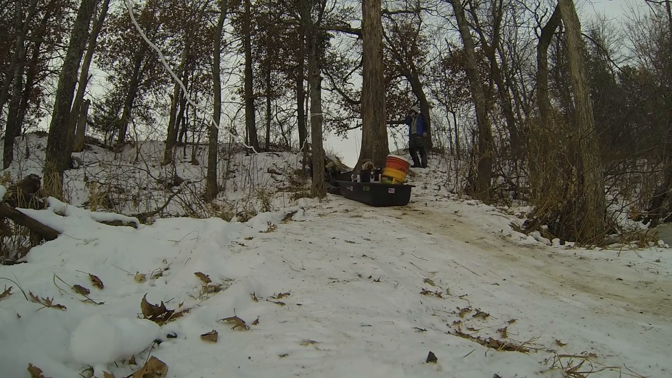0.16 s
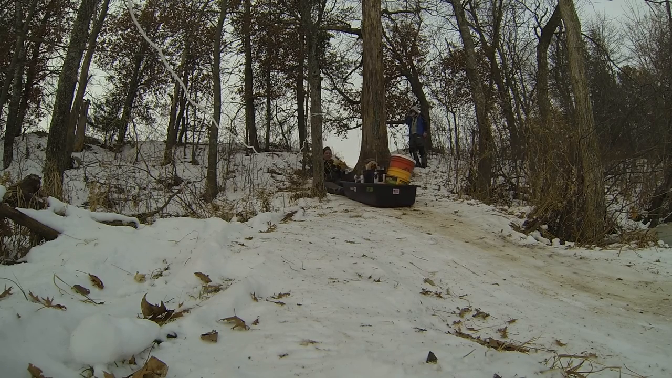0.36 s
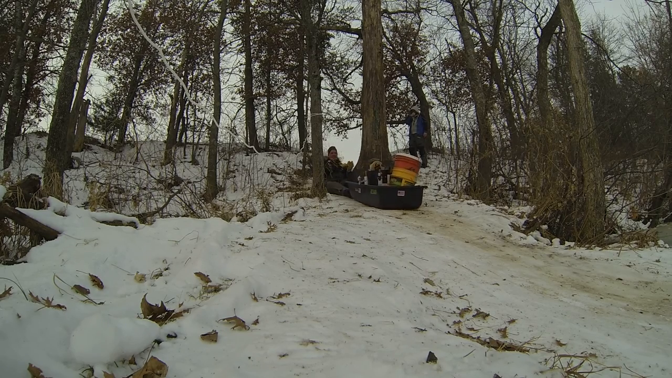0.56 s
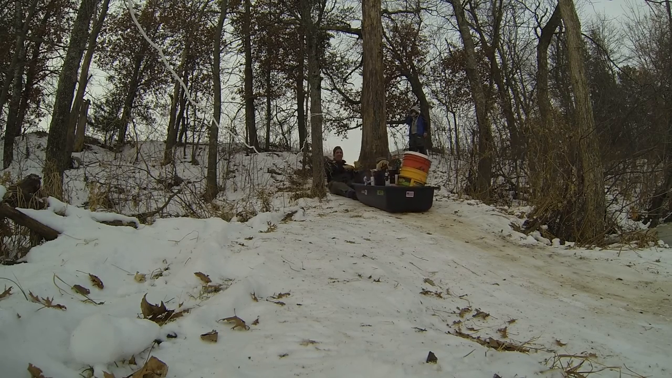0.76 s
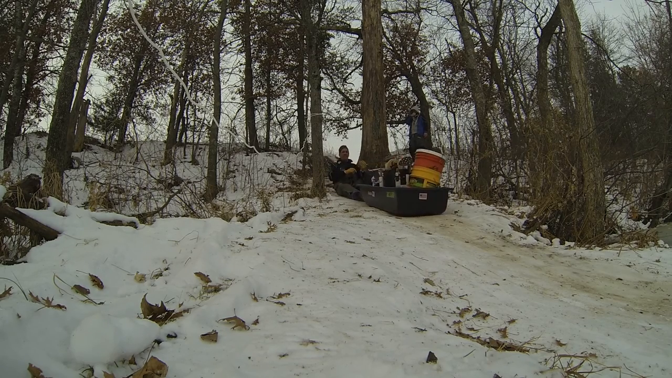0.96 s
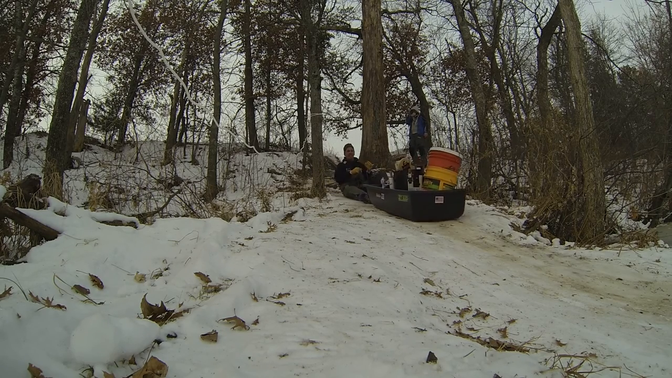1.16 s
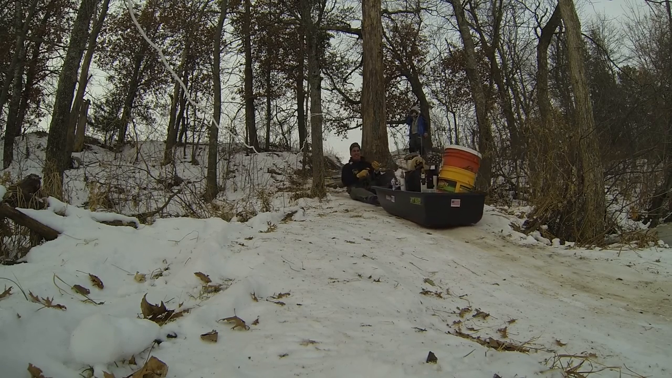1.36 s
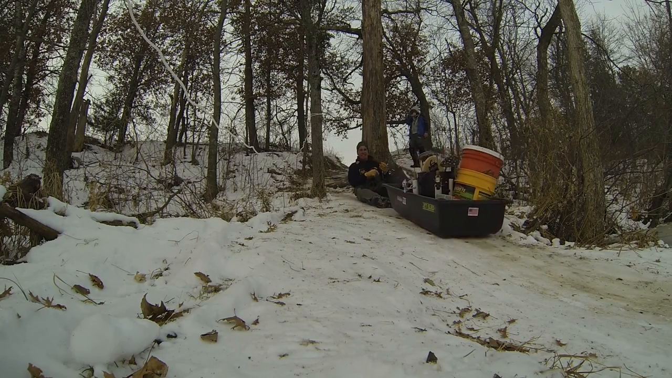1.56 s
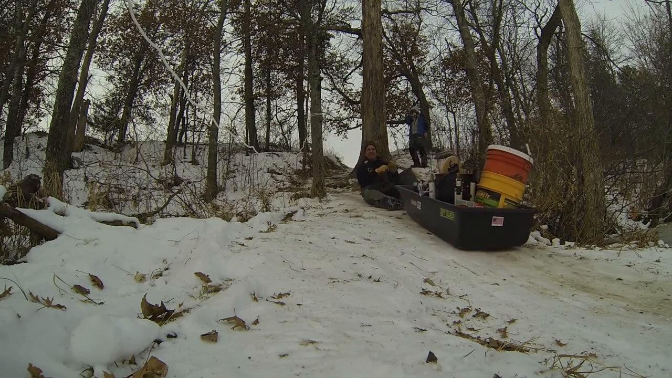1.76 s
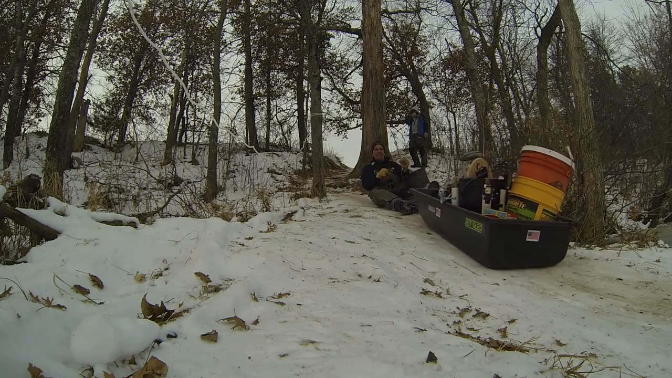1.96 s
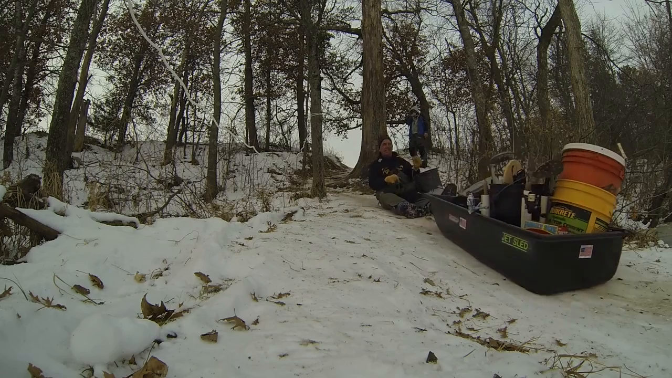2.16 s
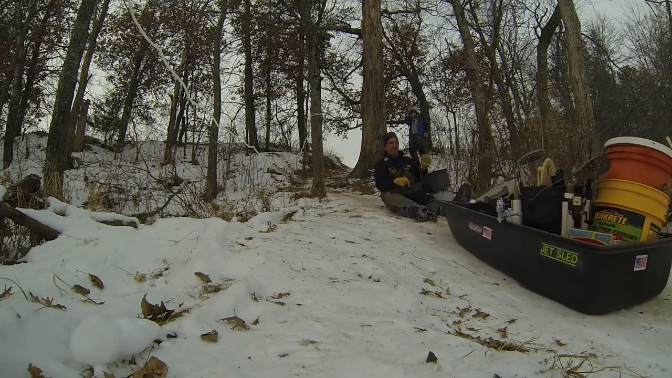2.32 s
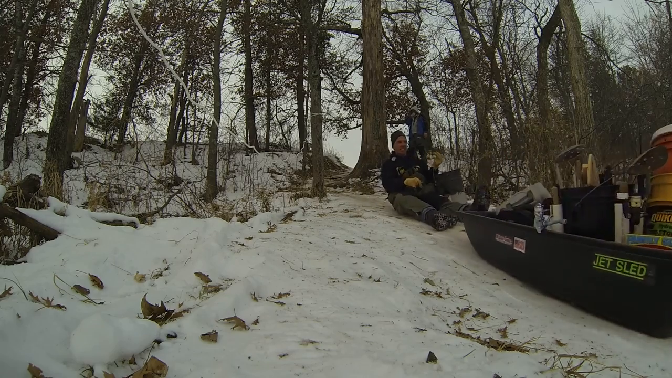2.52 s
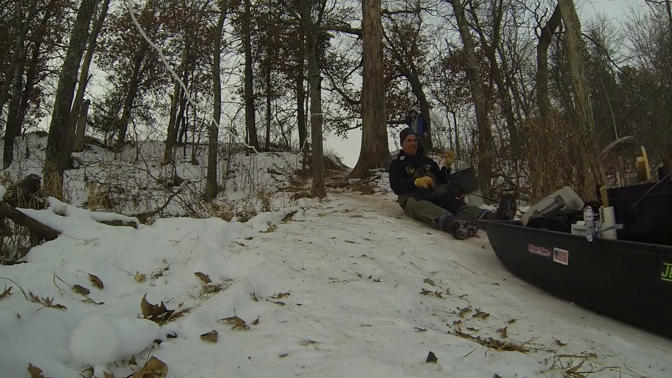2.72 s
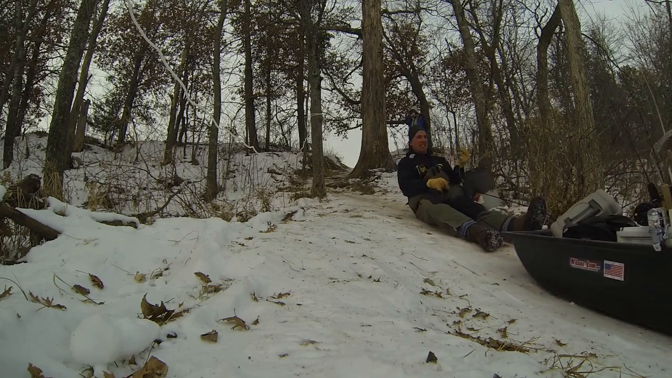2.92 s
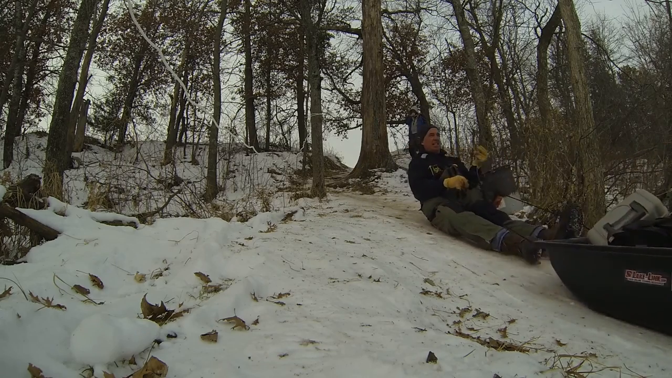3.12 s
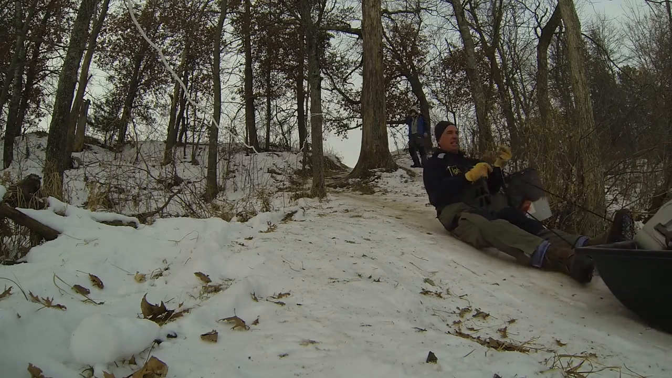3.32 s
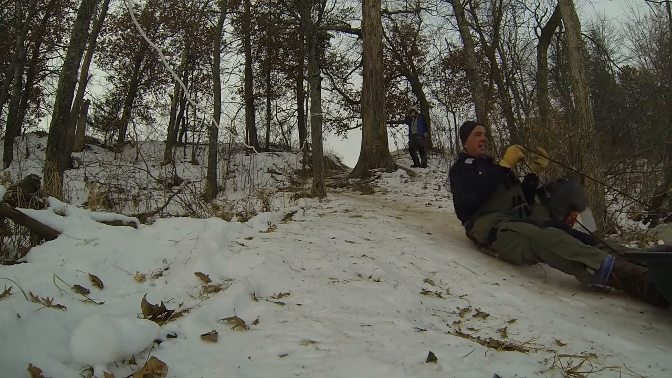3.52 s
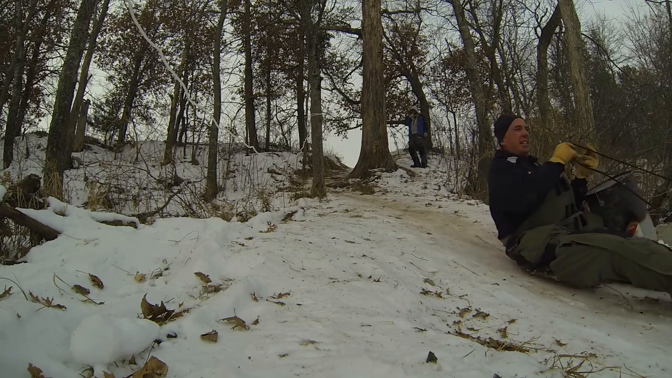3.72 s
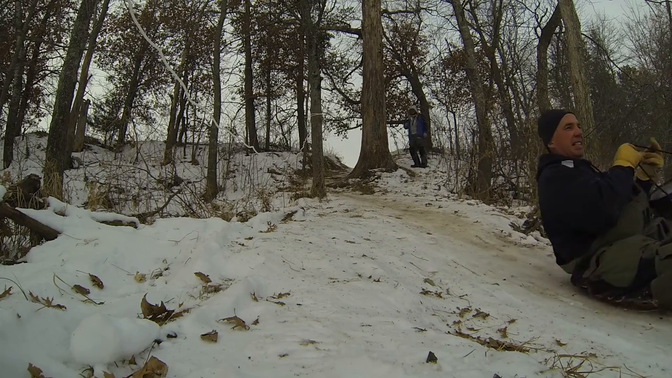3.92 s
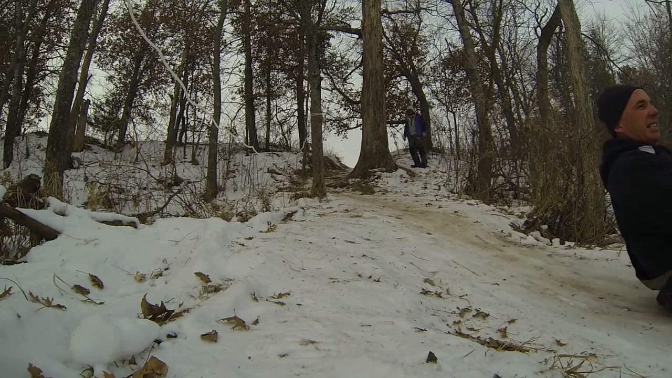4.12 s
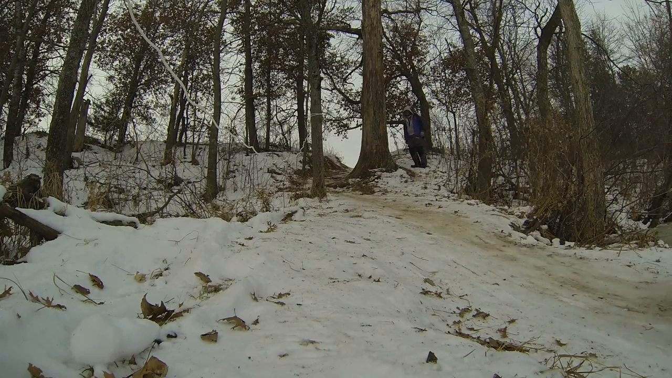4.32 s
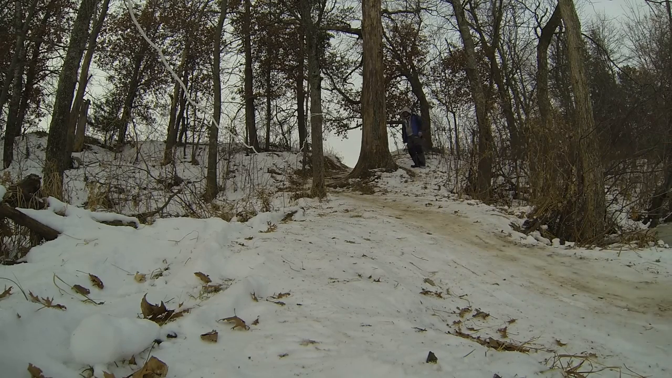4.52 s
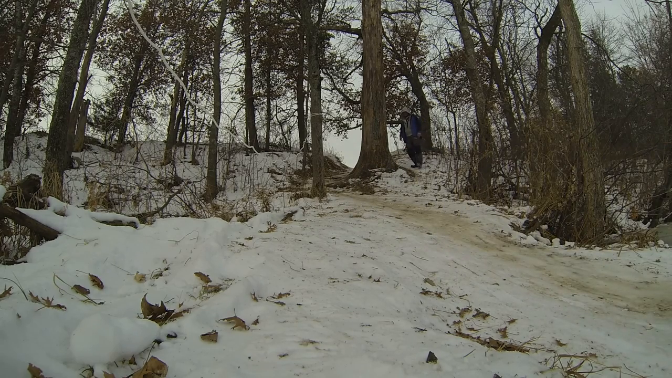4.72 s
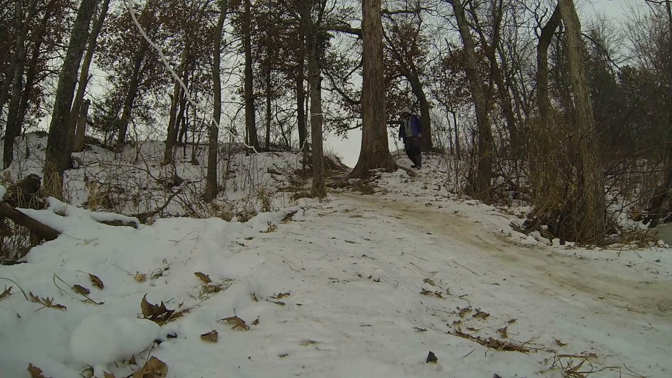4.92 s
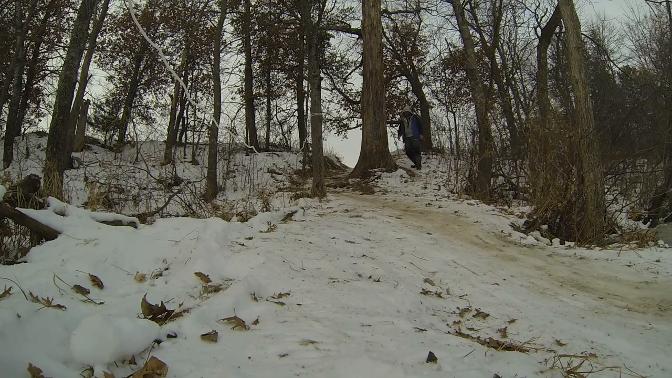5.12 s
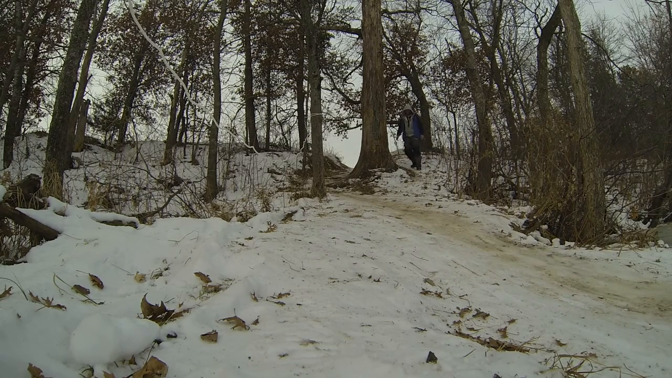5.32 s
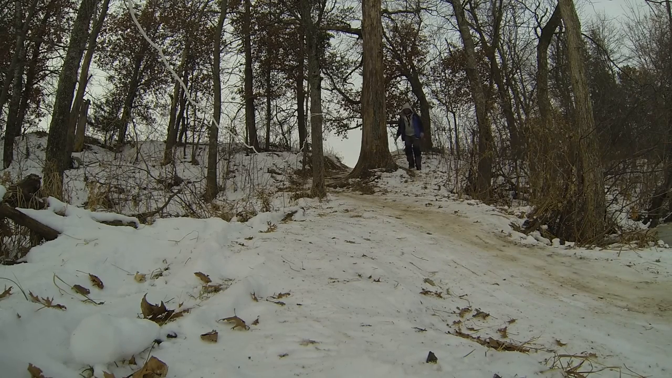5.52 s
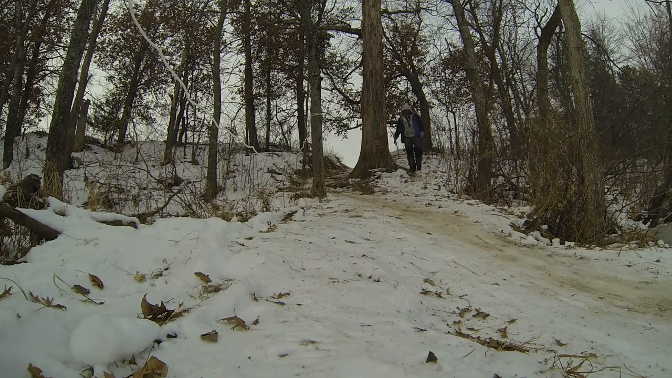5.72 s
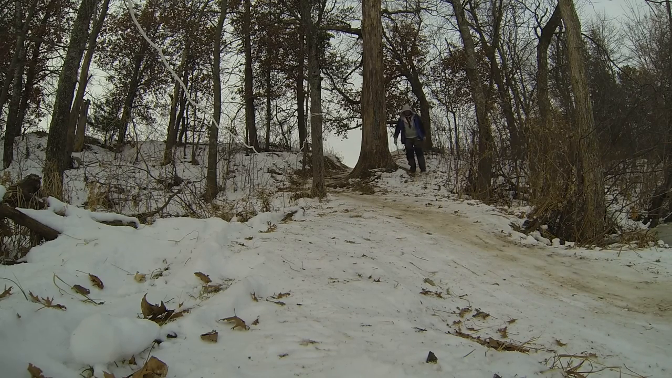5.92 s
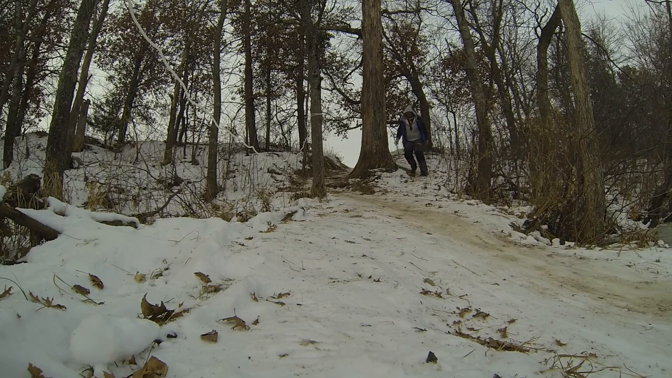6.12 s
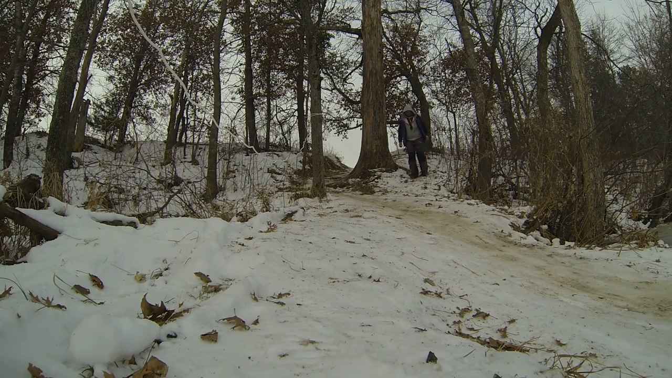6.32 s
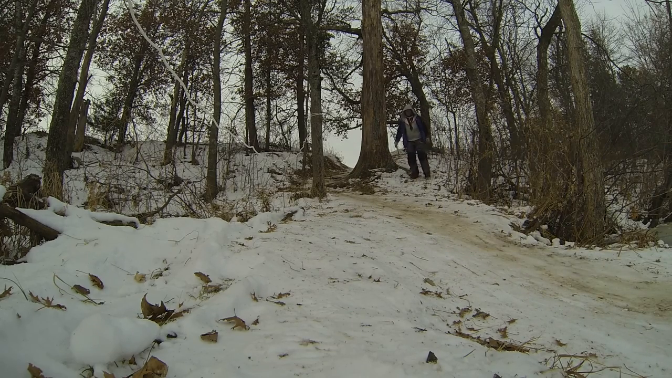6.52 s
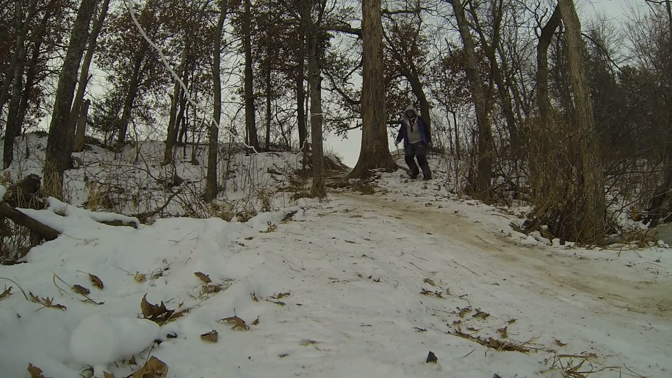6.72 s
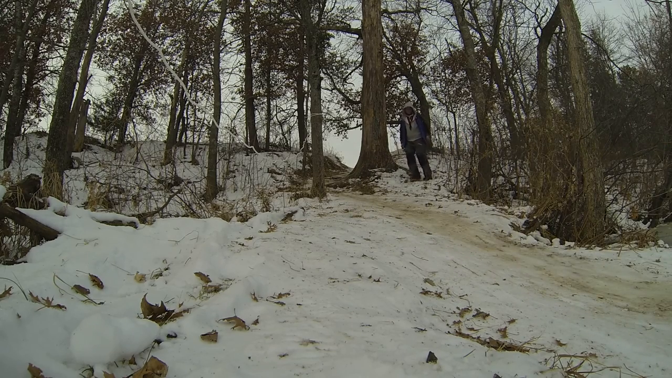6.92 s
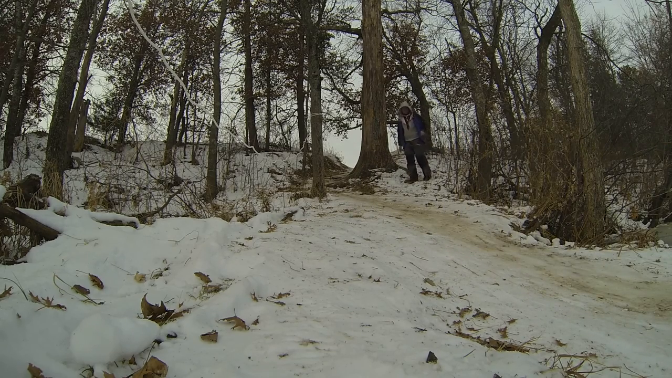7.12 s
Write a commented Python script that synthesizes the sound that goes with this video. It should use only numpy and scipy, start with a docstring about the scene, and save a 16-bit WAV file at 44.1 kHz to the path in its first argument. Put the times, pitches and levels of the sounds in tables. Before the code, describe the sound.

A loaded plastic sled scrapes past over crusty snow, its grainy hiss swelling and sinking with bumps and knocks, then faint distant boot scuffs.

```python
"""Faint crusty-snow rustle swells over 4 s as a loaded plastic sled and a person behind it slide past.
It sinks again, and from 5.6 s boots scuff far off; gear knocks and crisp ticks of twigs and crust dot the scene.
Grains and hiss make the snow, noise-shaken low modes the hull and ground, decaying bursts the knocks and ticks.
The microphone sits in a closed camera case whose cavity rings near 1.5 kHz and colours the snow sound.
Still air, self-noise and faint electronic tones lie beneath throughout."""
import sys
import numpy as np
from scipy import signal
from scipy.fft import rfft, irfft
from scipy.io import wavfile
from scipy.ndimage import uniform_filter1d

SR = 44100
rng = np.random.default_rng(int(sys.argv[2]) if len(sys.argv) > 2 else 0)


def to_wav(s):
    """Save 16-bit WAV."""
    ch = np.atleast_2d(s).T  # columns
    pcm = np.round(np.clip(ch, -1, 1) * 32767)  # PCM
    wavfile.write(sys.argv[1], SR, pcm.astype(np.int16))


N = 320607

# Still air and self-noise, relative spectrum. Each row: frequency in Hz, density in dB per Hz.
HUSH_SPECTRUM = [(15, -14), (25, 7), (59, 1.5), (125, -10), (1000, -19.5), (1630, -20.5), (2070, -27.5),
                 (2850, -21.5), (3440, -25.5), (8780, -36.5), (10000, -30), (13800, -42.5), (15000, -67)]
# Tones of the camera electronics. Each row: frequency in Hz, rms level in dB.
ELECTRONIC_TONES = [(9411, -96), (9830, -94), (9890, -93), (10429, -92), (12647, -99), (12707, -102),
                    (13127, -100)]
# Crushed grains, relative spectrum. Each row: frequency in Hz, density in dB per Hz.
SNOW_SPECTRUM = [(150, -3), (250, -5), (500, -8.5), (1000, 0.5), (2000, -9), (4000, -27), (8000, -39),
                 (15000, -41)]
# Peaks and notches of the camera case. Each row: frequency in Hz, width in Hz, gain in dB.
CASE_MODES = [(761, 203, -9), (1003.5, 280, -26.5), (1438, 464, 15.5), (1677, 240, 9), (2046, 380, -10),
              (2302, 83, 6.5), (2440, 170, 3), (2809, 330, 15), (3570, 150, 1.5), (4740, 330, -3),
              (5050, 1240, 7.5), (5770, 150, -7), (7370, 1400, 10), (9670, 1100, -7), (10000, 580, 12),
              (12200, 400, -6), (12700, 600, 2), (13700, 900, 2), (14900, 800, -6)]
# Extra peaks and notches for sound from ahead. Each row: frequency in Hz, width in Hz, gain in dB.
AHEAD_MODES = [(2800, 240, -8.5), (3110, 390, 16.5), (3490, 340, -26), (4430, 230, 9), (4600, 250, -11),
               (5150, 680, 3.5), (7500, 820, -14)]
# The same for sound from beside and behind. Each row: frequency in Hz, width in Hz, gain in dB.
BESIDE_MODES = [(2340, 140, 1), (3600, 370, 2), (5200, 900, -1.5), (7350, 900, 2), (9900, 300, -3),
                (10500, 600, 3.5)]
# Edges in Hz of the adjoining bands rumble, cavity, crunch, rasp and spray.
BAND_EDGES_HZ = (190, 950, 2100, 3400, 6200, 16000)
# Low modes of ground, large panel and small panel. Each row: frequency in Hz, width in Hz,
# murmur in dB when the hull rumbles at -59 dB, share of the hull's swing, wander in dB,
# rise in dB per s, fall in dB per s.
LOW_MODES = [(43.8, 12, -66.5, 0.45, 3.5, 400, 400), (157.3, 26.5, -72.5, 0.33, 4, 500, 400),
             (243.3, 48, -67.5, 0.86, 4, 500, 400)]
# The ground thrums. Each row: start in seconds, length in seconds, level in dB.
GROUND_THRUMS = [(0.205, 0.27, -54), (0.634, 0.05, -58), (0.92, 0.14, -49.5), (1.148, 0.059, -55),
                 (1.47, 0.066, -53), (1.66, 0.28, -54), (2.185, 0.33, -52), (2.686, 0.12, -53),
                 (2.998, 0.18, -54.5), (3.38, 0.1, -56), (3.507, 0.13, -52), (3.867, 0.17, -44.5),
                 (4.098, 0.38, -53.5), (4.545, 0.05, -55), (4.662, 0.064, -51), (4.772, 0.15, -55.5),
                 (4.995, 0.051, -59), (6.536, 0.062, -55), (6.893, .3, -59)]
# The hull thumps. Each row: start in seconds, length in seconds, large panel in dB, small panel in dB.
HULL_THUMPS = [(0.026, 0.035, -59.5, -69), (0.358, 0.046, -61.5, -69), (0.613, 0.044, -57, -68),
               (0.72, 0.05, -59.5, -68), (0.843, 0.06, -57, -61), (1.093, 0.064, -54.5, -58.5),
               (1.234, 0.098, -58, -62.5), (1.55, 0.052, -55.5, -66), (1.724, 0.047, -60, -56.5),
               (1.78, 0.042, -57.5, -62), (1.903, 0.06, -51.5, -66), (2.02, 0.028, -61, -53.5),
               (2.115, 0.08, -56, -63), (2.255, 0.065, -55, -59), (2.41, 0.038, -59.5, -55),
               (2.49, 0.12, -56, -63), (3.462, 0.04, -64, -53.5), (3.584, 0.053, -70, -50.5),
               (3.695, 0.048, -56, -56.5), (3.833, 0.1, -62, -48), (4.154, 0.064, -58, -61),
               (4.263, 0.07, -55, -61), (4.367, 0.087, -57, -49.5)]
# Ticks of twigs and crust. Each row: start in seconds, snap level in dB before TICK_TRIM_DB,
# colour in Hz, peak of the lower crunch in dB re the snap.
CRUST_TICKS = [(0.4545, -58, 4460, 14.5), (0.9107, -51, 3540, 12), (0.9373, -44, 4530, -9),
               (1.2875, -54, 5380, -6), (1.7376, -39, 5070, -14), (2.1024, -36.5, 4960, -7),
               (2.2517, -33.5, 4900, -3), (2.2897, -47, 5300, -6), (2.5694, -38, 4220, -11),
               (2.9604, -54, 3890, -1), (3.0394, -38, 3850, -10), (3.4804, -43, 3570, -6),
               (3.6954, -43, 3410, 0), (3.827, -43, 3470, 13), (3.93, -30.5, 3430, -3),
               (4.1744, -45, 3440, -1), (4.22, -32, 3660, 3), (4.5144, -46, 5150, 9),
               (5.159, -54, 3670, 10), (5.5794, -51, 3560, -6)]
# Knocks of gear and hull. Each row: start in seconds, ping level in dB before KNOCK_TRIM_DB,
# thud in dB re the ping before THUD_TRIM_DB.
GEAR_KNOCKS = [(0.4565, -47, 4), (0.61, -46, -5), (1.3533, -53, -9), (1.738, -28, -4), (2.1043, -28.5, -15),
               (2.292, -37, -3), (3.025, -38, -19), (3.258, -25.5, -32), (3.414, -27, -8), (3.66, -23, -30),
               (3.8677, -14, -30), (4.2554, -18, -15), (5.141, -28.5, -33), (5.1615, -19.5, -28),
               (5.5593, -45, -18), (5.914, -41, -19), (6.8084, -39.5, -13), (7.0509, -46, -24)]
# Far scuffs of boots. Each row: start in seconds, length in seconds, scrape in dB, crunch in dB,
# rasp in dB, fine spray in dB.
BOOT_SCUFFS = [(5.575, 0.015, -53.5, -65, -73, -80), (5.645, 0.022, -50, -62, -66.5, -74),
               (5.83, .13, -56.5, -69.5, -75, -81), (6.15, 0.018, -61.5, -81, -80, -88),
               (6.34, 0.022, -59.5, -70, -73, -79), (7.06, .12, -46.5, -55.5, -62, -68),
               (7.21, .07, -49.5, -57.5, -65, -70)]
# Bumps in the track. Each row: start in seconds, length in seconds, surge in dB, treble surge in dB,
# jolt of the hull in dB; negative entries are raised to zero.
TRACK_BUMPS = [(0.455, 0.014, 1, 4.5, 8.5), (0.62, .03, 3, 2.5, 3), (0.93, 0.036, 1.5, 1, 2.5),
               (1.13, 0.027, 1.5, 5, 3), (1.58, 0.041, 3.5, -1.5, 1), (1.74, 0.023, 7, 5.5, 7),
               (1.92, 0.029, 5.5, 5, 6.5), (2.11, .02, -1, 3, 4), (2.26, 0.015, -2, 2, 1),
               (2.57, 0.032, 5.5, 0.5, -7), (2.96, 0.012, 3.5, 3.5, 4.5), (3.04, 0.013, -2, 1.5, 1),
               (3.5, 0.044, 0, 2.5, 3), (3.87, 0.012, 3.5, 1.5, 3), (3.94, 0.0067, 3, 1, 1),
               (4.04, 0.0067, 3.5, 4, 3.5), (4.12, .02, 0.5, -1, -2.5), (4.17, 0.013, 1.5, 3, 4.5),
               (4.28, 0.01, 4.5, 3, 7.5), (4.41, 0.032, 3, 1.5, 4), (4.67, 0.01, 2.5, 1.5, 1),
               (4.76, 0.016, 4, 2, 1), (4.9, 0.011, 2.5, 1, 4.5), (5.02, 0.01, 3, -2, 2.5),
               (5.16, 0.03, 4.5, 4.5, 4)]
# Bearing of the slide. Each row: time in seconds, share that comes from ahead.
AHEAD_SHARE = [(0, 0.22), (2.6, 0.62), (3.4, 0.084), (7.27, 0)]
# The pass before bumps. Each row: time in seconds, scrape in dB, lower cavity boost in dB, crunch in dB,
# fine spray in dB, hull rumble in dB.
SLED_PASS = [(0.0, -67.5, 2, -71, -85, -67), (0.85, -63, 0.5, -65, -82, -66),
             (0.93, -61, 5, -62.5, -80, -61), (1.4, -63, 8, -61.5, -79, -63.5),
             (1.7, -60, 5.5, -60, -79, -62.5), (1.8, -56, 8.5, -56, -72, -57),
             (2.08, -56, 8, -59.5, -76, -61.5), (2.2, -48.5, 4, -56.5, -71.5, -58.5),
             (2.55, -48.5, 3, -54.5, -67.5, -56), (2.76, -50.5, 5, -59.5, -75, -57),
             (2.98, -43, -1, -54.5, -71, -57), (3.44, -45.5, 9, -53.5, -71, -56.5),
             (3.58, -38.5, 0.5, -50.5, -68, -52.5), (3.84, -36, 1, -49, -65.5, -49),
             (4.03, -30.5, -2, -45.5, -58.5, -44.5), (4.28, -32.5, 0, -48, -62, -48.5),
             (4.36, -38.5, 3, -50.5, -66, -48.5), (4.7, -42.5, -1, -55, -68.5, -55.5),
             (5.05, -44.5, -2.5, -58.5, -74.5, -60.5), (5.3, -53.5, -6, -67.5, -85, -70),
             (5.5, -60.5, -5, -82, -91, -70.5), (6.07, -67, -6, -80, -90, -69),
             (6.4, -59, -6.5, -71, -83, -71), (7.27, -58.5, -11, -66.5, -77, -67.5)]

HUSH_DB, HISS_DB = -59.5, -79.5
FRAME_HZ = 59.94
CUTOFF_HZ = 15200   # stopband edge
TICK_TRIM_DB, KNOCK_TRIM_DB, THUD_TRIM_DB = -7.5, -5.5, -5.5
BUMP_RISE_DB_S, BUMP_FALL_DB_S = 500, 153   # slopes (dB per s)
SCUFF_RISE_DB_S, SCUFF_FALL_DB_S = 300, 115   # slopes (dB per s)
GRAINS_PER_S = 900   # before clumping
RASP_DB, RASP_AHEAD_DB = -7, 7   # re crunch; change per unit share ahead
GROUND_DB, GROUND_AHEAD_DB = -64.5, 2.5   # when the hull rumbles at -58 dB; gain per unit share ahead
GROUND_FOLLOWS, GROUND_JOLT = 0.51, 0.94   # shares of the hull's swing and of its jolts


def from_db(db):
    """Amplitude ratio: 20 dB is a factor of ten."""
    return 10 ** (np.asarray(db) / 20)


def louder(a_db, b_db):
    """Incoherent sounds add in power."""
    return 10 * np.log10(from_db(2 * a_db) + from_db(2 * b_db))


def rms_one(x):
    """Normalise the effective amplitude to 1."""
    return x / np.sqrt(np.mean(x ** 2) + 1e-20)


def in_time(rows):
    """Linear interpolation turns each column of a timed table into a curve over all samples."""
    s, *columns = np.transpose(rows)
    return [np.interp(np.arange(N) / SR, s, c) for c in columns]


def swells(rows, column, rise_db_s, fall_db_s):
    """Exponential growth and decay are straight lines in dB, here with a hold between; the loudest event wins."""
    t = np.arange(N // 40 + 1) * 40 / SR
    each = []
    for row in rows:
        start, length = row[:2]
        rise = rise_db_s * np.maximum(start - t, 0)
        fall = fall_db_s * np.maximum(t - start - length, 0)
        each.append(row[column] - rise - fall)
    return np.interp(np.arange(N) / SR, t, np.max(each, axis=0))


def drift(rate_hz):
    """Noise through two equal low-pass poles gives a slow random curve of rms 1."""
    r = np.exp(-80 * np.pi * rate_hz / SR)   # one step every 40 samples
    noise = rng.standard_normal(N // 40 + 2002)
    slow = signal.lfilter([1], [1, -2 * r, r * r], noise)[2000:]
    return np.interp(np.arange(N) / 40, np.arange(len(slow)), rms_one(slow))


def colour(x, spectrum):
    """A folded cepstrum yields the minimum-phase filter of a spectrum, so nothing sounds early."""
    hz, db = np.transpose(spectrum)
    grid = np.maximum(np.fft.rfftfreq(8192, 1 / SR), 1)
    gain = from_db(np.interp(np.log(grid), np.log(hz), db))
    cepstrum = irfft(np.log(gain))
    cepstrum[1:4096] *= 2
    cepstrum[4097:] = 0
    impulse = irfft(np.exp(rfft(cepstrum)))
    return signal.fftconvolve(x, impulse)[:len(x)]


def band(x, low_hz, high_hz):
    """A Butterworth band-pass is flat within its edges."""
    return signal.sosfilt(signal.butter(N=3, Wn=[low_hz, high_hz], btype="band", fs=SR, output="sos"), x)


def resonance(x, hz, width_hz):
    """A damped mode is a pole pair, with gain 1 on top."""
    r = np.exp(-np.pi * width_hz / SR)
    poles = [1, -2 * r * np.cos(2 * np.pi * hz / SR), r * r]
    return signal.lfilter([(1 - r * r) / 2, 0, (r * r - 1) / 2], poles, x)


def peaks(x, table):
    """Modes in cascade: each section lifts or cuts around one frequency."""
    rows = []
    for hz, width_hz, db in table:
        a, w, alpha = from_db(db / 2), 2 * np.pi * hz / SR, np.pi * width_hz / SR
        zeros = [1 + alpha * a, -2 * np.cos(w), 1 - alpha * a]
        poles = [1 + alpha / a, -2 * np.cos(w), 1 - alpha / a]
        rows.append(np.array(zeros + poles) / poles[0])
    return signal.sosfilt(rows, x)


def through_case(x):
    """Source and filter: the snow spectrum, then the cavity modes of the case."""
    return peaks(colour(x + 1e-18, SNOW_SPECTRUM), CASE_MODES)


def split(x):
    """Band analysis of a sound heard through the case."""
    heard = through_case(x)
    return [band(heard, low, high) for low, high in zip(BAND_EDGES_HZ, BAND_EDGES_HZ[1:])]


def camera():
    """Stationary noise plus sinusoids: self-noise, a narrow hiss modulated at the frame rate, steady tones."""
    t = np.arange(N) / SR
    hush = from_db(HUSH_DB) * rms_one(colour(rng.standard_normal(N), HUSH_SPECTRUM))
    buzz_db = 2.4 * np.cos(2 * np.pi * FRAME_HZ * t) + 2.8 * np.cos(4 * np.pi * FRAME_HZ * t)
    narrow = resonance(rng.standard_normal(N), 10030, 280)
    hiss = from_db(HISS_DB) * rms_one(narrow * from_db(buzz_db))
    tones = 0
    for hz, db in ELECTRONIC_TONES:
        tones = tones + from_db(db) * np.sqrt(2) * np.sin(2 * np.pi * (hz * t + rng.random()))
    return hush + hiss + tones


def drumming():
    """Noise-driven narrow modes: a wandering murmur that follows the hull, and louder thrums and thumps."""
    out, hull_db = 0, in_time(SLED_PASS)[-1]
    events = ((GROUND_THRUMS, 2), (HULL_THUMPS, 2), (HULL_THUMPS, 3))
    for low_mode, (rows, column) in zip(LOW_MODES, events):
        hz, width_hz, murmur_db, follows, wander_db, rise, fall = low_mode
        mode = resonance(resonance(rng.standard_normal(N), hz, width_hz), hz, width_hz)
        size = np.sqrt(uniform_filter1d(mode ** 2, size=3000))
        steadied = rms_one(mode / (size + 0.69 * size.mean()))   # evens out the random swells
        murmur_db = murmur_db + follows * (hull_db + 59) + wander_db * drift(4.6)
        event_db = swells(rows, column=column, rise_db_s=rise, fall_db_s=fall)
        out = out + from_db(louder(murmur_db, event_db)) * steadied
    return out


def ticks():
    """Brittle fracture: a few ms of decaying noise, broad around its own colour, with crunch near 3 kHz."""
    after = np.arange(600) / SR
    envelope = (1 - np.exp(-after / .0008)) * np.exp(-after / .003)
    splinters = rng.standard_normal((len(CRUST_TICKS), 600)) * envelope
    out = np.zeros(N + 600)
    for (s, level_db, hz, crunch_db), row in zip(CRUST_TICKS, splinters):
        snap = peaks(resonance(resonance(row, hz, 2600), hz, 2600), CASE_MODES[7:])   # upper case modes only
        crunch = resonance(resonance(row, 2700, 700), 2700, 700)
        burst = snap / np.abs(snap).max() + from_db(crunch_db) * crunch / np.abs(crunch).max()
        start = int(s * SR)
        out[start:start + 600] += from_db(level_db + TICK_TRIM_DB) * burst
    return out[:N]


def knocks():
    """Impulse response: a knock pings the cavity once, softly, over a short dull thud of decaying noise."""
    after = np.arange(2000) / SR
    envelope = (1 - np.exp(-after / 0.0017)) * np.exp(-after / 0.0056)
    shakes = rng.standard_normal((len(GEAR_KNOCKS), 2000)) * envelope
    impulse = np.eye(1, 2000)[0]
    ping = resonance(split(impulse)[1], 1820, 540)
    out = np.zeros(N + 2000)
    for (s, level_db, thud_db), shake in zip(GEAR_KNOCKS, shakes):
        thud = band(shake, 200, 670)
        thud_gain = from_db(thud_db + THUD_TRIM_DB)
        burst = ping / np.abs(ping).max() + thud_gain * thud / np.abs(thud).max()
        start = int(s * SR)
        out[start:start + 2000] += from_db(level_db + KNOCK_TRIM_DB) * burst
    return out[:N]


def crushed_grains():
    """Shot noise: grains of uneven size break at random in clumps, over a smooth hiss."""
    sizes = from_db(2.12 * np.minimum(rng.exponential(1, N), 5)) * rng.choice([-1, 1], N)
    born = rng.random(N) < GRAINS_PER_S * from_db(4.0 * drift(25)) / SR
    grains = rms_one(sizes * born) + from_db(4.0) * rng.standard_normal(N)
    return grains * from_db(0.67 * drift(26))


def ground_rumble(hull_db, jolt_db, ahead):
    """Forced vibration: low band noise follows part of the hull's swing and jolts."""
    level_db = GROUND_DB + GROUND_FOLLOWS * (hull_db + 58) + GROUND_AHEAD_DB * ahead
    level_db = level_db + GROUND_JOLT * jolt_db + 2.5 * drift(4)
    return from_db(level_db) * rms_one(band(rng.standard_normal(N), 66, 126.6))


def slide():
    """Friction noise in bands: sled and boots share the grains, and bumps make the sled's bands surge together."""
    scrape_db, boost_db, crunch_db, spray_db, hull_db = in_time(SLED_PASS)
    ahead = np.clip(in_time(AHEAD_SHARE)[0], 0, 1)
    surge_db, treble_db, jolt_db = [
        np.maximum(swells(TRACK_BUMPS, column=k, rise_db_s=BUMP_RISE_DB_S, fall_db_s=BUMP_FALL_DB_S), 0)
        for k in range(2, 5)]
    scuff_db, scuff_crunch_db, scuff_rasp_db, scuff_spray_db = [
        swells(BOOT_SCUFFS, column=k, rise_db_s=SCUFF_RISE_DB_S, fall_db_s=SCUFF_FALL_DB_S)
        for k in range(2, 6)]
    hull, cavity, *treble = [rms_one(part) for part in split(crushed_grains())]
    # the heavy sled drives the lower side of the cavity more than far rustles do
    lower = resonance(cavity, 1314, 286)
    out = from_db(louder(scrape_db + surge_db, scuff_db)) * (cavity + (from_db(boost_db) - 1) * lower)
    crunch_db = crunch_db + treble_db
    rasp_db = crunch_db + RASP_DB + RASP_AHEAD_DB * ahead
    levels = (louder(crunch_db, scuff_crunch_db), louder(rasp_db, scuff_rasp_db),
              louder(spray_db + treble_db, scuff_spray_db))
    for part, level_db in zip(treble, levels):
        from_ahead = ahead * rms_one(peaks(part, AHEAD_MODES))
        from_beside = (1 - ahead) * rms_one(peaks(part, BESIDE_MODES))
        out += (from_ahead + from_beside) * from_db(level_db + 1.0 * drift(26))
    out += from_db(hull_db + jolt_db) * hull
    return out + ground_rumble(hull_db, jolt_db, ahead)


def scene():
    """Superposition: pressures of all sources add at the single microphone."""
    return (camera() + drumming() + ticks() + knocks() + slide())[None]


def record(dry):
    """Band limitation: a steep low-pass cuts the top by 45 dB."""
    return signal.sosfilt(signal.cheby2(22, 45, CUTOFF_HZ, fs=SR, output="sos"), dry)


dry = scene()
out = record(dry)
to_wav(out)
```